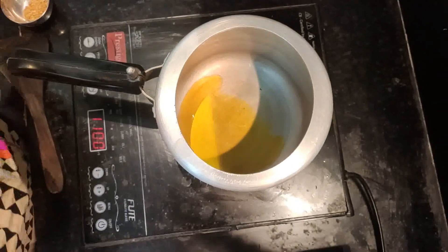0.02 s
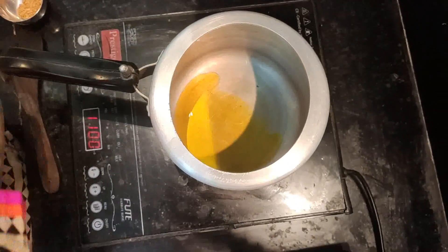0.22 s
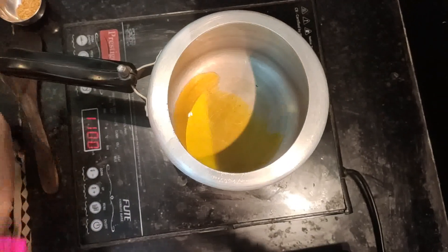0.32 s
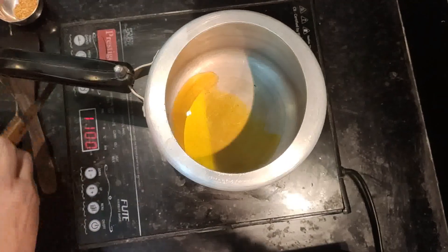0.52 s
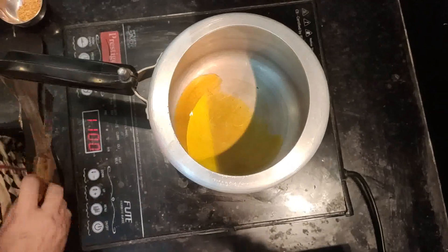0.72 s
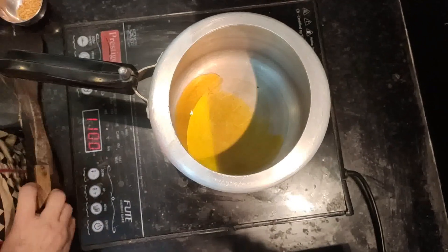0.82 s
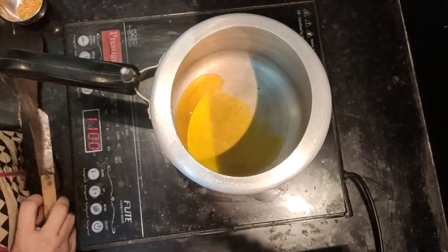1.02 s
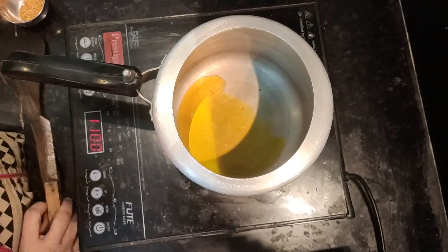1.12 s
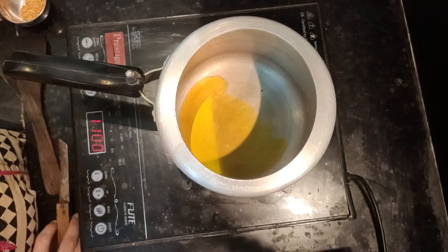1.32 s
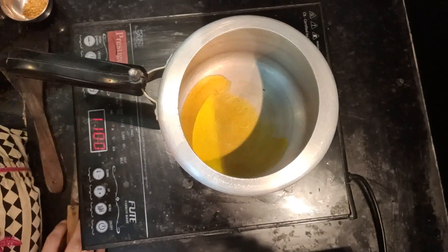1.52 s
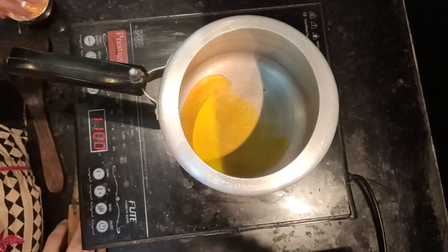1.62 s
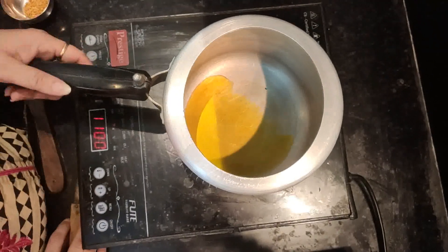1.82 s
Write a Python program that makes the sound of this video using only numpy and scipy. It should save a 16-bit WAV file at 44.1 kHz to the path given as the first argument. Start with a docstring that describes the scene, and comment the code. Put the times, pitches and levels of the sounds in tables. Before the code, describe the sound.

Sharp knife knock, then a metallic clink and light scuffs, with an induction cooktop humming.

```python
"""A knife knocks sharply on an induction cooktop, clinks as it is laid down, slides and scuffs lightly.
Each contact is a noise crack plus ringing modes, reflected by a small hard kitchen.
The hand then brushes over the cooktop towards the handle of a pressure cooker.
Under the pot the cooktop runs throughout: mains hum, fan blade tones and rushing air."""
import sys
import numpy as np
from scipy import signal
from scipy.fft import rfft, irfft
from scipy.io import wavfile

SR = 44100
rng = np.random.default_rng(int(sys.argv[2]) if len(sys.argv) > 2 else 0)


def dump_mix(stems):
    """Bounce the given channels to the path in sys.argv[1] as a 16-bit WAV at rate SR."""
    frames = np.atleast_2d(stems).T  # one column per channel
    limited = np.clip(frames, -1, 1)  # hard clip at full scale
    pcm = np.round(limited * 32767).astype(np.int16)
    wavfile.write(sys.argv[1], SR, pcm)


N = 81585
TIME_S = np.arange(N) / SR
FREQ_HZ = np.fft.rfftfreq(N, 1 / SR)


def amp(db):
    """Decibels to gain."""
    return 10 ** (np.asarray(db) / 20)


def unit_rms(x):
    """Scale to rms 1."""
    return x / np.sqrt(np.mean(abs(x) ** 2) + 1e-20)


def at_freq(points, hz):
    """Interpolate a table over log frequency."""
    freq_hz, value = np.transpose(points)
    return np.interp(np.log(hz + 1), np.log(freq_hz + 1), value)


def pan(db):
    """Stereo gains, left minus right in dB."""
    return amp([[db / 2], [-db / 2]])


def wander(rate_hz):
    """Smooth random drift, rms 1."""
    lowpass = np.exp(-(FREQ_HZ / rate_hz) ** 2) * (FREQ_HZ > 0)
    return unit_rms(irfft(rfft(rng.standard_normal(N)) * lowpass, N))


def colour(x, spectrum, size=2048):
    """Minimum-phase filter with the given spectrum."""
    log_gain = np.log(amp(at_freq(spectrum, abs(np.fft.fftfreq(size, 1 / SR)))))
    taps = np.fft.ifft(np.exp(np.conj(signal.hilbert(log_gain)))).real
    return signal.fftconvolve(x, taps[None, :size // 2], axes=1)[:, :N]


# knife on casing: start_s, strength_db, contact_t60_s
KNOCK_BLOWS = [(.4888, 5.5, 0.0082), (.4913, 1, 0.011), (.4926, -4.5, 0.043), (.539, -32, 0.029)]
# knock resonances: pitch_hz, gain_db, t60_s
KNOCK_RINGS = [(340, -45, 0.043), (378, -18, 0.046), (562.6, -31.5, 0.11), (657.4, -33.5, 0.18),
               (742, -28, 0.094), (2650, -30, 0.026), (3190, -33, 0.079), (3570, -24, 0.051),
               (3910, -22.5, 0.026), (4970, -31, .06), (6060, -19, 0.027), (7090, -27.5, 0.097),
               (8360, -47, 0.029), (9970, -20, 0.039)]
# knock crack: freq_hz, gain_db
KNOCK_SPECTRUM = [(60, -46), (170, -23), (260, -11), (390, 17.5), (520, -35), (720, -8), (950, 5.5),
                  (1650, -11), (2100, -1.5), (2800, 4.5), (3600, 5.5), (5200, -1), (9500, -0.5),
                  (12500, -3.5)]


def knife_knock():
    """The knife hits the cooktop casing: a sharp crack and a short ring."""
    hit = strike(KNOCK_BLOWS, KNOCK_RINGS, KNOCK_SPECTRUM, crack_db=-12.5, ring_db=-5,
                 crack_pan_db=0.5, ring_pan_db=1, rattle_rad=0.58)
    return kitchen(hit, wet_db=-7)


# blade bounces: start_s, strength_db, contact_t60_s
CLINK_BLOWS = [(1.0542, -7, 0.027), (1.0565, 5, 0.031), (1.0645, 2, 0.08), (1.0715, -2, 0.12),
               (1.079, -6, 0.11), (1.138, -14, 0.065)]
# blade resonances: pitch_hz, gain_db, t60_s
BLADE_RINGS = [(1957, -41, 0.12), (4263, -33, 0.18), (4372, -16, 0.045), (4485, -28, 0.066),
               (8200, -37, 0.13), (8305, -29.5, 0.077), (8450, -43, 0.044)]
# clink crack: freq_hz, gain_db
CLINK_SPECTRUM = [(100, 9), (300, -2), (440, 12.5), (600, 0), (1100, 3), (1850, 9), (2800, 2.5), (4300, 3),
                  (5400, -19), (7200, -9), (8400, 3.5), (10200, -16), (12500, -14)]


def blade_clink():
    """The blade is laid down, rings and chatters to rest."""
    hit = strike(CLINK_BLOWS, BLADE_RINGS, CLINK_SPECTRUM, crack_db=-28.5, ring_db=-2,
                 crack_pan_db=2.5, ring_pan_db=2.5, rattle_rad=0.81)
    return kitchen(hit, wet_db=-5)


# light contacts: start_s, strength_db, contact_t60_s
SCUFF_BLOWS = [(1.511, -10.5, 0.038), (1.514, -12, 0.066), (1.5228, -0.5, 0.034), (1.528, 0.5, 0.03),
               (1.535, -7, 0.066), (1.542, -8, 0.075), (1.559, -25, .06), (1.845, -6.5, 0.072)]
# scuff resonances: pitch_hz, gain_db, t60_s
SCUFF_RINGS = [(2425, -49, 0.035), (5010, -36.5, 0.09), (7980, -37.5, .07), (10950, -43, 0.061)]
# scuff and brush noise: freq_hz, gain_db
SCUFF_SPECTRUM = [(200, -4), (1500, 0.5), (2800, -5.5), (4500, 5), (6500, 0.5), (9000, 4.5), (11200, 4),
                  (12500, 0)]


def metal_scuff():
    """Light metal contacts as the hand lets go and moves on."""
    hit = strike(SCUFF_BLOWS, SCUFF_RINGS, SCUFF_SPECTRUM, crack_db=-30, ring_db=4,
                 crack_pan_db=0.5, ring_pan_db=-2, rattle_rad=0.72)
    return kitchen(hit, wet_db=-7)


def strike(blows, modes, spectrum, crack_db, ring_db, crack_pan_db, ring_pan_db, rattle_rad,
           rattle_hz=70, spread_hz=2500, low_cut_hz=207):
    """Each blow cracks and feeds the modes; loose contact jitters their phase."""
    t = np.arange(SR // 12) / SR
    bursts, rings = np.zeros((2, N)), np.zeros((2, N))
    for start_s, db, contact_t60_s in blows:
        burst = amp(db + crack_db - 60 * t / contact_t60_s) * rng.standard_normal((2, len(t)))
        span = bursts[:, round(start_s * SR):][:, :len(t)]
        span += burst[:, :span.shape[1]]
    cracks = colour(widen(*bursts, mono_hz=spread_hz / 2), spectrum)
    jitter_rad = rattle_rad * wander(rattle_hz)
    since_first_s = TIME_S - blows[0][0]
    for hz, mode_db, t60_s in modes:
        energy = sum((TIME_S >= start_s) * amp(db - 60 * abs(TIME_S - start_s) / t60_s) ** 2
                     for start_s, db, _ in blows)
        stereo_lag_rad = np.array([[0], [min(hz / spread_hz, np.pi / 2)]])
        phase_rad = 2 * np.pi * hz * since_first_s + jitter_rad - stereo_lag_rad
        rings += amp(mode_db + ring_db) * np.sqrt(energy) * np.sin(phase_rad)
    hit = cracks * pan(crack_pan_db) + rings * pan(ring_pan_db)
    # small parts radiate little bass
    return signal.sosfilt(signal.butter(3, low_cut_hz, "high", fs=SR, output="sos"), hit)


# slides after the clink: start_s, length_s, level_db
SLIDE_STROKES = [(1.198, .045, -60), (1.263, 0.045, -49.5), (1.308, .025, -55.5)]
# thin rasp: freq_hz, gain_db
RASP_SPECTRUM = [(200, -44), (3800, -24), (4360, -6), (5000, -26), (7800, -11), (8400, 3), (8900, -10),
                 (12500, -25)]


def blade_slide():
    """Faint sliding friction excites the blade's upper resonances."""
    push = np.zeros(N)
    for start_s, length_s, db in SLIDE_STROKES:
        progress = np.clip((TIME_S - start_s) / length_s, 0, 1)
        push += amp(db) * np.sqrt(np.sin(np.pi * progress).clip(0))
    return kitchen(push * friction(RASP_SPECTRUM, grain_db=3, grain_hz=150), wet_db=-3)


# rub envelope: time_s, level_db
BRUSH_LEVELS = [(1.48, -60), (1.51, -45), (1.7, -58), (1.78, -52.5), (1.85, -45)]


def hand_brush():
    """The hand rubs over the cooktop, fading, then swelling near the pot handle."""
    envelope = amp(np.interp(TIME_S, *np.transpose(BRUSH_LEVELS))) * (TIME_S >= BRUSH_LEVELS[0][0])
    return envelope * friction(SCUFF_SPECTRUM, grain_db=1, grain_hz=120)


def friction(spectrum, grain_db, grain_hz):
    """Grainy rubbing noise, rms 1."""
    grains = rng.standard_normal((2, N)) * amp(grain_db * wander(grain_hz))
    return unit_rms(colour(grains, spectrum))


# room decay: freq_hz, t60_s
KITCHEN_DECAY = [(200, 0.39), (660, 0.39), (1800, 0.52), (4500, 0.39), (8000, 0.37), (12000, 0.31)]


def kitchen(x, wet_db, build_s=0.0027, density=0.15):
    """Add dense reflections off near walls, dying band by band."""
    t = np.arange(SR // 2) / SR
    echoes = rng.standard_normal((2, len(t))) * (rng.random((2, len(t))) < density)
    echoes *= 1 - np.exp(-(t / build_s) ** 2)
    hz, age_s, bands = signal.stft(widen(*echoes, mono_hz=500), SR, nperseg=256)
    decay = amp(-60 * age_s / at_freq(KITCHEN_DECAY, hz)[:, None])
    tail = signal.istft(bands * decay, SR)[1]
    tail /= np.linalg.norm(tail[0])
    return x + amp(wet_db) * signal.fftconvolve(x, tail, axes=1)[:, :N]


def widen(mid, side, mono_hz):
    """Mid/side to stereo, narrowing below mono_hz."""
    side = signal.lfilter(*signal.butter(1, mono_hz, "high", fs=SR), side)
    return np.array([mid + side, mid - side])


# mains tones: pitch_hz, level_db, waver_depth
MAINS_TONES = [(49.3, -52, 0.2), (100, -52.5, 0.86)]
# mains swell: time_s, gain_db
MAINS_GAIN = [(0, -1), (.2, 2), (.7, -1), (1.1, 2.5), (1.85, 0.5)]
# fan tones: blade_rate_multiple, level_db, waver_depth
FAN_HARMONICS = [(1, -43.5, 0.26), (2, -62.5, 0.58), (4, -59.5, 1), (7, -67, 1)]


def cooktop_hum(blade_hz=282.1):
    """Mains hum plus harmonics of the fan's blade-passing rate."""
    swell = amp(np.interp(TIME_S, *np.transpose(MAINS_GAIN)))
    mains = swell * sum(wavering_tone(*row) for row in MAINS_TONES)
    fan = sum(wavering_tone(k * blade_hz, db, depth) for k, db, depth in FAN_HARMONICS)
    return (mains + fan) * pan(db=1.56)


def wavering_tone(hz, db, depth, waver_hz=10.3):
    """A sine drifting in level and phase."""
    wobble = 1 + depth * (wander(waver_hz) + 1j * wander(waver_hz)) / np.sqrt(2)
    carrier = np.exp(2j * np.pi * (hz * TIME_S + rng.random()))
    return amp(db) * unit_rms((wobble * carrier).real)


# air noise: freq_hz, relative_density_db
AIR_SPECTRUM = [(10, -2), (25, 6), (40, -48), (75, -2.5), (130, -9), (190, -7), (245, -11), (335, 2.5),
                (440, 0.5), (510, -12), (585, -3), (660, -10.5), (745, -4), (830, -9.5), (1000, -3.5),
                (1100, -7.5), (1200, -10.5), (1330, -3), (1550, -11), (2000, -12), (3000, -17),
                (4300, -20.5), (6000, -24.5), (6800, -24.5), (7600, -23.5), (9000, -28), (10600, -27),
                (11400, -18), (12000, -20), (12400, -22.5)]
# left-right likeness: freq_hz, coherence
AIR_COHERENCE = [(30, 0.64), (300, 1), (600, 0.51), (1100, 0.18), (3000, 0.033), (12000, 0.034)]


def fan_air(level_db=-41.5, flutter_db=0.8, flutter_hz=25):
    """Turbulence in the fan and vents, alike on both sides only at low frequencies."""
    left, independent = rfft(rng.standard_normal((2, N)))
    coherence = np.clip(at_freq(AIR_COHERENCE, FREQ_HZ), -1, 1)
    right = coherence * left + np.sqrt(1 - coherence ** 2) * independent
    rush = irfft(np.array([left, right]) * amp(at_freq(AIR_SPECTRUM, FREQ_HZ)), N)
    return amp(level_db + flutter_db * wander(flutter_hz)) * unit_rms(rush) * pan(db=0.5)


def scene():
    """Knife handling over the running cooktop."""
    cooktop = cooktop_hum() + fan_air()
    return knife_knock() + blade_clink() + blade_slide() + metal_scuff() + hand_brush() + cooktop


def record(dry, ceiling=0.85, cutoff_hz=12550):
    """Soft peak limit, then low-pass."""
    limited = dry / (1 + (dry / ceiling) ** 4) ** (1 / 4)
    lowpass = signal.firwin(511, cutoff_hz, window=("kaiser", 9), fs=SR)
    return signal.oaconvolve(limited, lowpass[None], "same")


dry = scene()
out = record(dry)
dump_mix(out)
```